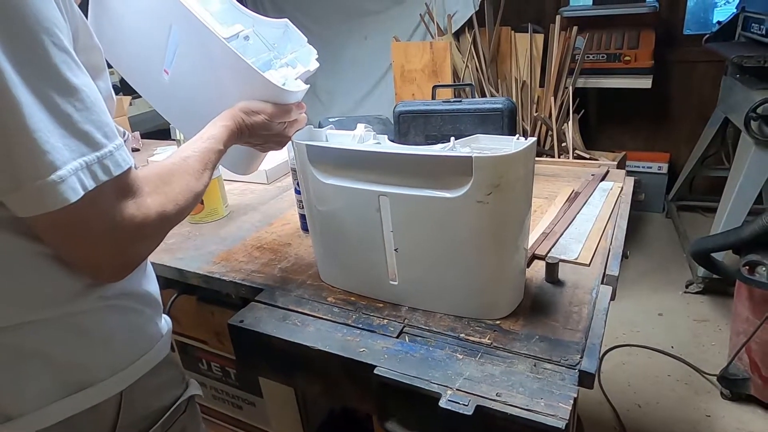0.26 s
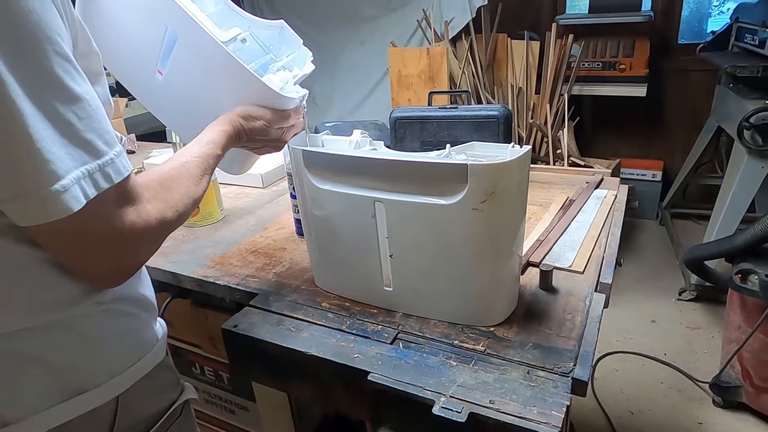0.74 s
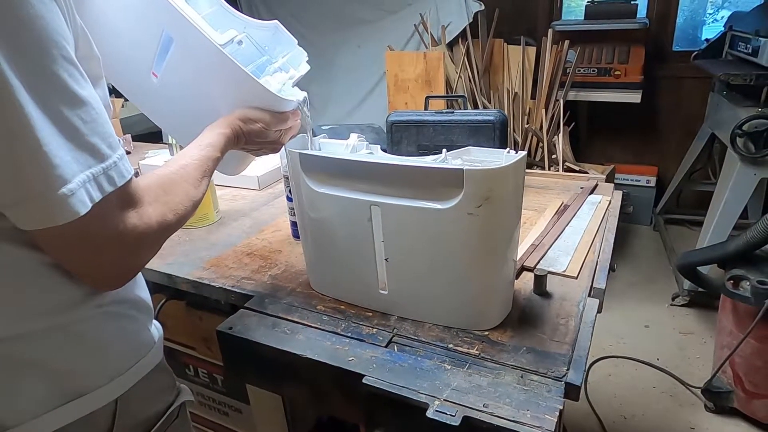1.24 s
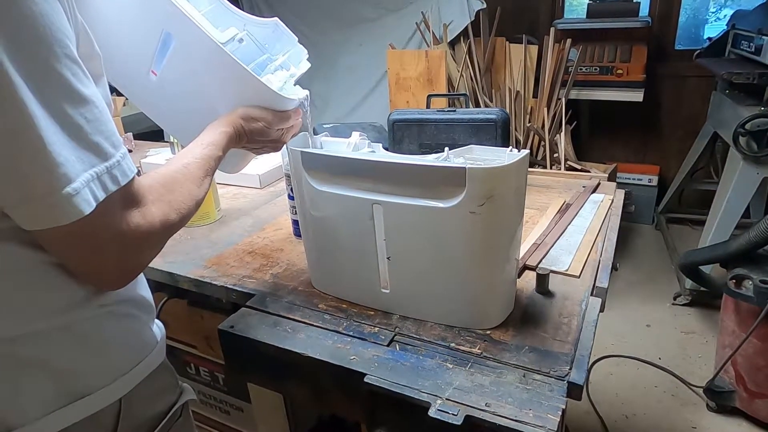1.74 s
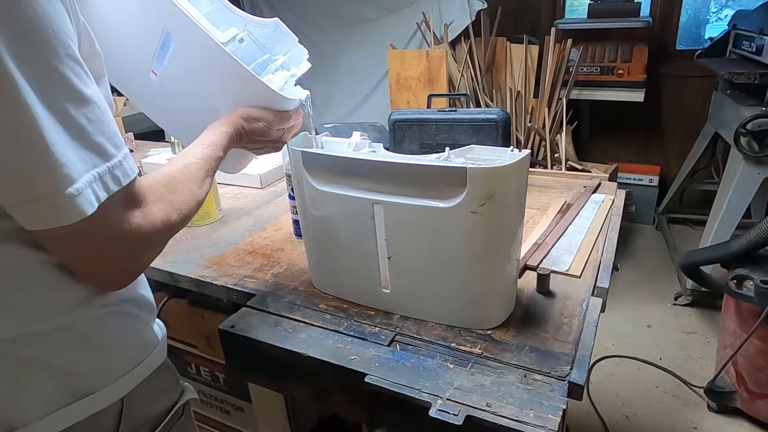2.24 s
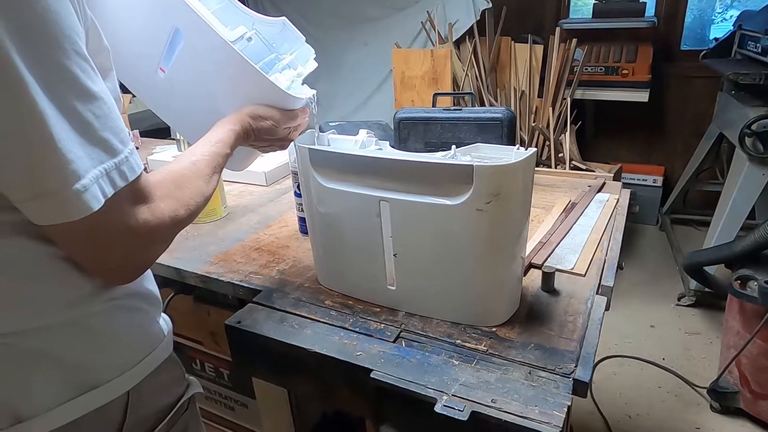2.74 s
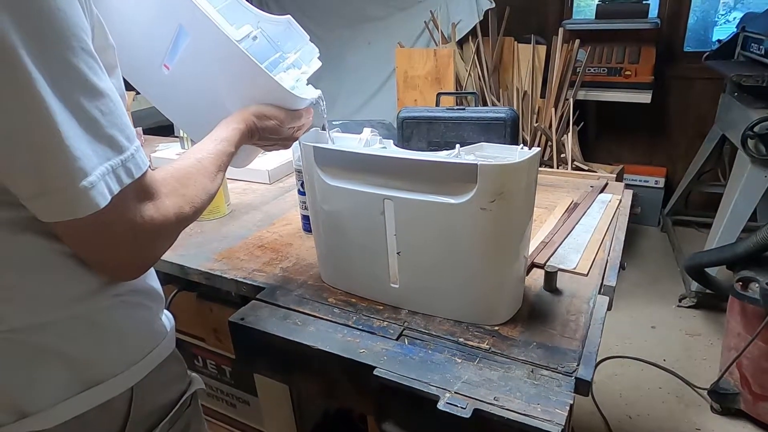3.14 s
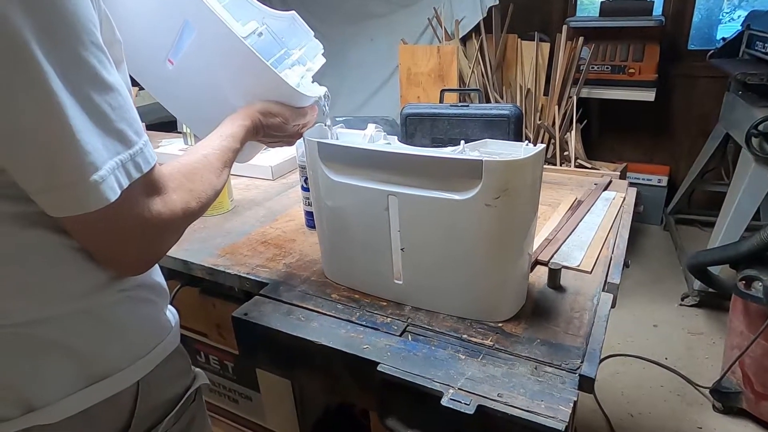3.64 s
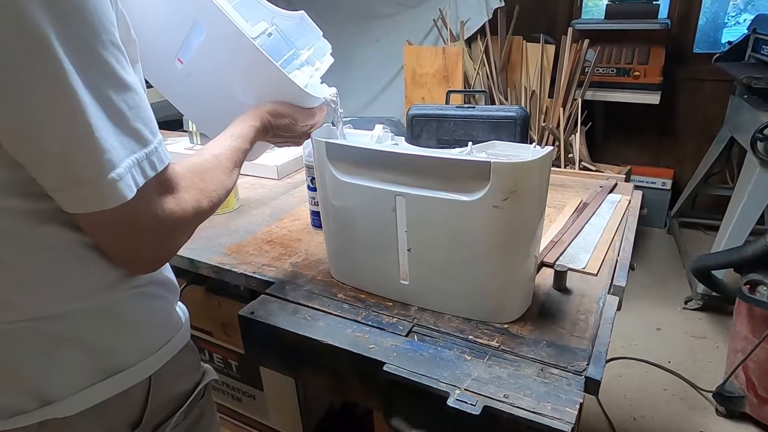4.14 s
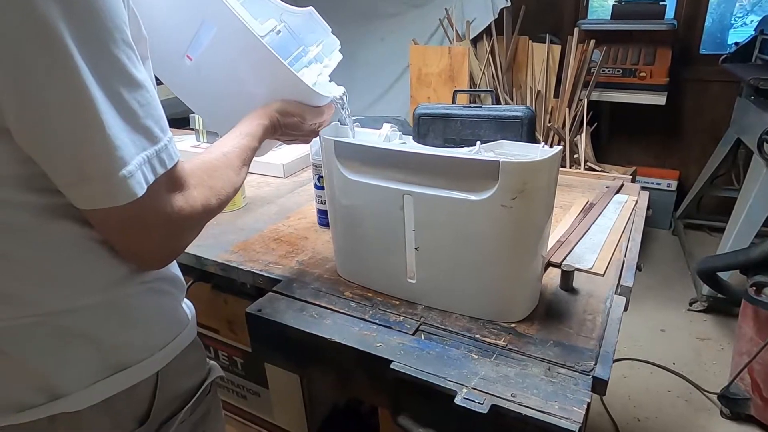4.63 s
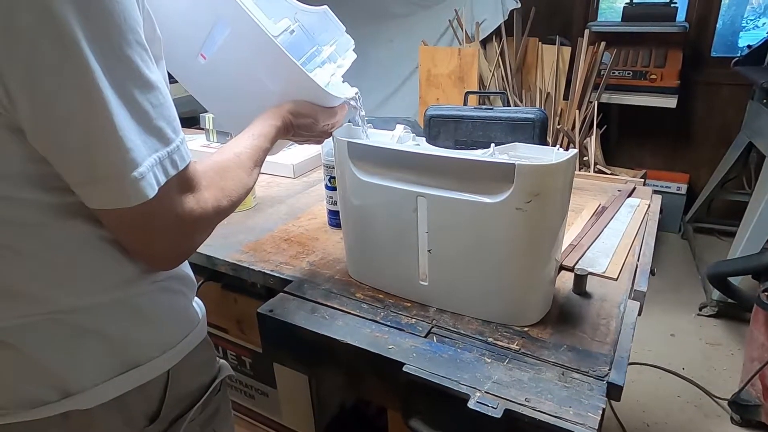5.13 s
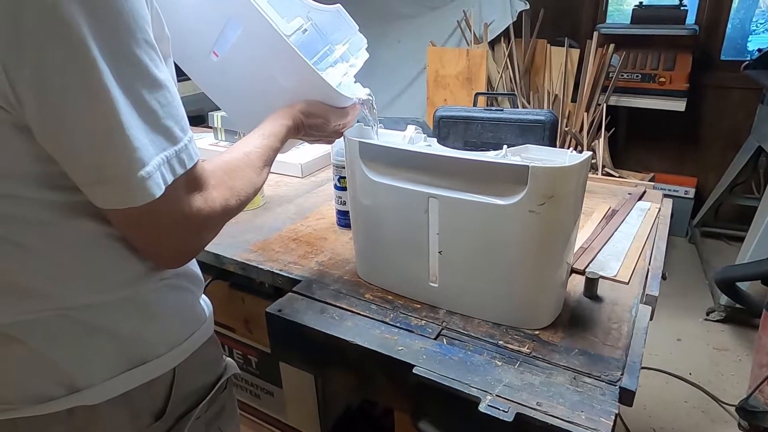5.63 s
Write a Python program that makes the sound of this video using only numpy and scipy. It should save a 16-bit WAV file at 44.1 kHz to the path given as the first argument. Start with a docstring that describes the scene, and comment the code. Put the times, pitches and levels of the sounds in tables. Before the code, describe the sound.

Hands bump a plastic tub, then water tumbles out unevenly into another, with bright slaps, chirping bubbles and short hollow reflections.

```python
"""Water is tipped from one plastic bucket into another on a workshop bench, over quiet room tone.
Hands first knock the bucket: low thuds with scuffing ticks and faint treble puffs.
From about one second a broken stream slaps the water in noise bursts, traps chirping bubbles,
spatters in thousands of tiny grains, drums the resonant walls and thumps the bench.
Reflections in bucket and room ring after it all."""
import sys
import numpy as np
from scipy import signal
from scipy.fft import rfft, irfft, next_fast_len
from scipy.io import wavfile
from scipy.ndimage import uniform_filter1d, map_coordinates

SR = 44100
rng = np.random.default_rng(int(sys.argv[2]) if len(sys.argv) > 2 else 0)


def dump_mix(stems):
    """Bounce the given channels to the path in sys.argv[1] as a 16-bit WAV at rate SR."""
    frames = np.atleast_2d(stems).T  # one column per channel
    limited = np.clip(frames, -1, 1)  # hard clip at full scale
    pcm = np.round(limited * 32767).astype(np.int16)
    wavfile.write(sys.argv[1], SR, pcm)


N = 259308

# strength of the stream: start_s, level_db (spatter, before the cavity)
FLOW = [(0.998, -82), (1.03, -62), (1.2, -43.5), (1.36, -45.5), (1.44, -54), (1.56, -42), (1.72, -57.5),
        (1.8, -56), (2.06, -59), (2.17, -51.5), (2.28, -56), (2.4, -45), (2.76, -47.5), (2.96, -61.5),
        (3.04, -79), (3.1, -55), (3.22, -53), (3.44, -45.5), (3.67, -59.5), (3.779, -43), (3.93, -54.5),
        (4.04, -45), (4.2, -50), (4.38, -43.5), (4.52, -49.5), (4.66, -53.5), (4.74, -46.5), (4.85, -49),
        (5.15, -45.5), (5.88, -43.5)]
# spectrum of the spatter and spray: pitch_hz, level_db (per Hz)
SPATTER = [(400, -40), (544, -2.5), (848, -5), (989, -0.5), (1230, 2.5), (1640, -2.5), (2260, -2),
           (2720, 1.5), (5000, -1.5), (9290, -10.5), (13000, -27), (15600, -32)]


def amp(db):
    """Turns dB into gain."""
    return 10 ** (np.asarray(db) / 20)


def evened(x):
    """Scales to rms 1."""
    return x / np.sqrt(np.mean(x ** 2) + 1e-20)


def read(points, hz):
    """Reads a table on a log-frequency axis."""
    f, value = np.transpose(points)
    return np.interp(np.log(hz + 1), np.log(f + 1), value)


def level_at(curve, s, column=1):
    """Reads a dB curve over time; -120 dB before its first point."""
    columns = np.transpose(curve)
    return np.interp(s, columns[0], columns[column], left=-120)


def add(mix, s, sound):
    """Mixes a sound in at s seconds."""
    part = mix[round(s * SR):][:len(sound)]
    part += sound[:len(part)]


def colour(x, gain):
    """Filters x by a gain given as a function of frequency."""
    size = next_fast_len(x.shape[-1] * 9 // 8)  # room for the filter's tail
    spectrum = rfft(x, size) * gain(np.fft.rfftfreq(size, 1 / SR))
    return irfft(spectrum, size)[..., :x.shape[-1]]


def modes(table):
    """Complex response of a set of damped resonances."""
    return lambda hz: sum(amp(db) / (1 + 2j * (hz - f) / width) for f, width, db in table)


def around(f, hz, octaves):
    """Bell-shaped gain around a pitch, on an octave axis."""
    return np.exp(-.5 * (np.log2((f + 1) / hz) / octaves) ** 2)


def wandering(width):
    """Slow random curve of rms 1: noise smoothed twice over width samples."""
    once = uniform_filter1d(rng.standard_normal(N), size=width)
    return evened(uniform_filter1d(once, size=width))


def bubble(t, hz, cycles, rise):
    """A trapped bubble: a sine dying by 1/e in so many cycles, its pitch climbing near the surface."""
    u = t * hz / cycles
    tone = np.sin(2 * np.pi * hz * t * (1 + rise * u))
    return tone * (1 - np.exp(-u / 0.029)) * np.exp(-u) * (u < 6)


def slaps():
    """Each lump of water landing gives a short burst around its pitch, a bubble and a wide spray."""
    # lumps of water landing: start_s, level_db (before the cavity), pitch_hz (of the burst)
    landings = [(1.062, -34, 5500), (1.107, -20.5, 5880), (1.169, -20, 3700), (1.196, -26.5, 3860),
                (1.27, -10.5, 3830), (1.305, -19.5, 3920), (1.449, -25.5, 6620), (1.488, -28, 5700),
                (1.513, -26, 3210), (1.6, -25.5, 1314), (1.749, -22.5, 3870), (1.766, -27.5, 3550),
                (1.871, -28.5, 4610), (1.965, -29.5, 5530), (1.997, -32, 5660), (2.112, -28, 5860),
                (2.191, -32.5, 1467), (2.299, -26.5, 4800), (2.31, -13.5, 3820), (2.412, -32, 3900),
                (2.482, -19.5, 5490), (2.521, -13.5, 3700), (2.695, -27, 1280), (2.781, -20.5, 3810),
                (2.89, -26.5, 3510), (3.049, -33.5, 4720), (3.131, -24, 3680), (3.13, -34, 1370),
                (3.22, -27, 4860), (3.345, -20.5, 4000), (3.39, -18, 2827), (3.586, -32.5, 5240),
                (3.661, -31.5, 5130), (3.689, -24.5, 3790), (3.897, -28, 4220), (3.985, -26, 4100),
                (4.035, -30, 4700), (4.109, -37, 1127), (4.222, -33, 3610), (4.32, -27, 5330),
                (4.387, -25, 4100), (4.405, -33, 1920), (4.726, -36, 1565), (4.848, -34, 973),
                (4.538, -35.5, 2660), (4.611, -26, 3170), (4.745, -42, 4460), (4.808, -41, 4000),
                (4.86, -25, 2620), (4.914, -26.5, 2950), (4.988, -33, 5500), (5.014, -30, 2800),
                (5.059, -21.5, 3860), (5.097, -27, 3210), (5.132, -24.5, 4800), (5.176, -22, 4180),
                (5.329, -38, 2410), (5.378, -34.5, 1600), (5.392, -27.5, 4360), (5.406, -17.5, 2750),
                (5.409, -26.5, 2130), (5.521, -30, 3540), (5.561, -34, 3600), (5.576, -28.5, 3470),
                (5.632, -22.5, 3460), (5.675, -22, 3530), (5.71, -26, 3360), (5.764, -27, 3220),
                (5.779, -39, 4230), (5.815, -33, 1690)]
    spread_oct, core_oct, core_db = 0.43, 0.18, 1.5  # width of the burst; its narrow core
    spray_db, spray_hz, spray_db_per_oct = -14, 3660, -5.5  # low, flat landings spray more
    bubble_share = 0.36
    out, t = np.zeros(N), np.arange(2048) / SR
    lumps = [*landings, *small_slaps()]
    noise = rng.standard_normal((len(lumps), 2, 2048))
    for (s, db, hz), (a, b) in zip(lumps, noise):
        spray_gain = amp(spray_db + spray_db_per_oct * np.log2(hz / spray_hz))
        cushion = 1 + 0.14 * (s - 1) ** 1.8  # deeper water softens and stretches each landing
        rise = 1 - np.exp(-t / (0.00017 * cushion))
        band = colour(a, lambda f: around(f, hz, spread_oct) + amp(core_db) * around(f, hz, core_oct))
        burst = evened(band) * rise * np.exp(-t / (0.0045 * np.sqrt(cushion)))
        spray = evened(colour(b, lambda f: amp(read(SPATTER, f)))) * rise * np.exp(-t / 0.0087)
        ring = bubble(t, .93 * hz, cycles=12.54, rise=0.0674)
        body = (1 - bubble_share) * burst / abs(burst).max() + 1.08 * bubble_share * ring
        add(out, s, amp(db) * (body + spray_gain * spray))
    return out


def small_slaps():
    """Lesser lumps land at random times, their levels following the stream at that moment."""
    per_s, offset_db, swing_db = 22.0, 0.5, 8  # level relative to the flow, spread either way
    low_hz, high_hz = 1545, 7130
    gap, size, pitch = rng.random((200, 3)).T
    s = FLOW[0][0] + np.cumsum(-np.log(gap + 1e-9) / per_s)
    db = level_at(FLOW, s) + offset_db + swing_db * (2 * size - 1)
    hz = low_hz * (high_hz / low_hz) ** pitch
    return [row for row in zip(s, db, hz) if row[0] < N / SR]


def smacks():
    """Flat smacks on the surface: a few milliseconds of bright crack over a broader wet slap."""
    # smacks, wide in pitch: start_s, treble_db, mid_db (rms of each noise before its envelope)
    smack_table = [(1.107, -43, -28), (1.1324, -31, -21.5), (1.1593, -28, -27), (1.253, -35, -43),
                   (1.27, -44, -23), (1.3047, -38, -36), (1.5975, -28, -31), (1.7494, -29.5, -28),
                   (2.1927, -35, -29), (2.3098, -44, -15), (2.3498, -36, -21.5), (2.6442, -21.5, -25),
                   (2.6952, -31, -37), (2.781, -23, -45), (3.2631, -27.5, -26), (3.39, -44, -31),
                   (3.5871, -24.5, -35.5), (3.6887, -28, -60), (4.009, -30, -38), (4.0296, -24, -35),
                   (4.1059, -23.5, -60), (4.3423, -33, -36), (4.355, -33, -45), (4.42, -31, -47),
                   (5.0681, -20, -18), (5.428, -31, -43), (5.71, -27.5, -35)]
    out, t = np.zeros(N), np.arange(1024) / SR
    noise = rng.standard_normal((len(smack_table), 2, 1024))
    for (s, treble_db, mid_db), (a, b) in zip(smack_table, noise):
        crack = evened(colour(a, lambda f: 1 / (1 + (6000 / (f + 1)) ** 4) / (1 + (f / 10500) ** 6)))
        wet = evened(colour(b, lambda f: 1 / (1 + (950 / (f + 1)) ** 8) / (1 + (f / 5200) ** 4)))
        crack = amp(treble_db) * crack * np.exp(-t / 0.0016)
        wet = amp(mid_db) * wet * np.exp(-t / 0.0022)
        add(out, s, (1 - np.exp(-t / 0.0016)) * (crack + wet))
    return out


def drips():
    """Lone droplets and bubbles: single chirping sines with a softened onset."""
    # start_s, level_db (before the cavity), pitch_hz (nominal), decay_cycles
    drip_table = [(0.833, -48, 8320, 4.9), (1.018, -46.5, 5400, 23), (2.135, -34, 4230, 9),
                  (2.819, -25.5, 1333, 3.7), (3.113, -27, 4600, 4.8), (3.302, -33, 1820, 6.2),
                  (3.735, -29, 1600, 6.7), (3.821, -36.5, 1220, 7.1), (4.167, -33.5, 3260, 8.3),
                  (4.4405, -34.5, 1390, 7.9), (4.479, -41, 1070, 7), (5.695, -24.5, 1825, 8),
                  (5.7446, -27.5, 1180, 4.6), (5.846, -27, 2740, 9)]
    out, t = np.zeros(N), np.arange(2048) / SR
    for s, db, hz, cycles in drip_table:
        onset = 1 - np.exp(-t / 0.00028)
        add(out, s, amp(db) * onset * bubble(t, 0.928 * hz, cycles, rise=0.0647))
    return out


def plinks():
    """Single clear bubbles chirp upward at random, their levels following the stream."""
    per_s, offset_db = 60.0, -2
    low_hz, high_hz = 986, 5090
    out, t = np.zeros(N), np.arange(2048) / SR
    gap, size, pitch, length = rng.random((400, 4)).T
    times = FLOW[0][0] + np.cumsum(-np.log(gap + 1e-9) / per_s)
    levels = level_at(FLOW, times) + offset_db - 2.6 * np.log(size + 0.018)  # a few stand out
    pitches = low_hz * (high_hz / low_hz) ** pitch
    for s, db, hz, c in zip(times, levels, pitches, length):
        add(out, min(s, N / SR), amp(db) * bubble(t, hz, cycles=4.95 + 8.1 * c, rise=0.065))
    return out


def spatter():
    """Thousands of droplets and small bubbles at 32 pitches, in clumps; a few are louder."""
    grains_per_s, clump_db = 130., 2  # rate at each pitch; rms swing of the clumps
    out, t = np.zeros(N), np.arange(1500) / SR
    for hz in np.geomspace(500, 15000, num=32):
        loudness = amp(2.0 * np.minimum(rng.exponential(1, N), 5))
        hits = loudness * (rng.random(N) < grains_per_s / SR)
        grain = bubble(t, hz, cycles=4.0 * rng.uniform(0.12, 2.82), rise=0.051)
        grain = grain / np.linalg.norm(grain)
        # energy per grain follows the spectrum; pitches are log spaced, so higher ones cover more band
        out += signal.oaconvolve(hits, grain)[:N] * amp(read(SPATTER, hz)) * np.sqrt(hz)
    clumped = evened(out * amp(clump_db * wandering(900)))
    return clumped * amp(level_at(FLOW, np.arange(N) / SR))


def drumming():
    """The lumpy stream shakes the plastic walls, which radiate little deep bass."""
    # breathing of the whole bucket: pitch_hz, width_hz, level_db (relative)
    breathing = [(175, 5.4, -3), (192.8, 7.8, -1)]
    # bending of the walls: pitch_hz, width_hz, level_db (relative)
    bending = [(235.7, 36.4, 4.5), (284.8, 2.3, 11.5), (310, 10.3, -0.5), (372.5, 6.6, 2)]
    # level of the drumming before the mix: start_s, deep_db, walls_db
    drum_levels = [(1.0, -78, -90), (1.05, -55, -69), (1.2, -46.5, -55), (1.36, -56, -51),
                   (1.72, -56, -52.5), (2.06, -53.5, -78), (2.26, -48.5, -56.5), (2.36, -67, -46),
                   (2.6, -58, -50.5), (2.8, -51.5, -55.5), (3.04, -63.5, -72.5), (3.22, -55, -63),
                   (3.44, -54, -44.5), (3.6, -56, -59), (3.75, -60, -56), (4.05, -61, -49.5),
                   (4.66, -64, -64.5), (4.9, -76, -51), (5.15, -69, -52), (5.3, -53, -51.5),
                   (5.88, -56.5, -50.5)]
    lumps = evened(uniform_filter1d(rng.standard_normal(N), size=700))
    push = rng.standard_normal(N) * amp(2. * lumps)
    radiate = lambda f: 1 / (1 + (164.5 / (f + 1)) ** 12)
    deep = evened(colour(push, lambda f: modes(breathing)(f) * radiate(f)))
    walls = evened(colour(push, lambda f: modes(bending)(f) * radiate(f)))
    t = np.arange(N) / SR
    return deep * amp(level_at(drum_levels, t)) + walls * amp(level_at(drum_levels, t, column=2))


def bench():
    """Heavy surges shake the bench top: soft swelling thumps of a low sine."""
    # start_s, level_db (the swell tops out 12 dB above it)
    thump_table = [(1.198, -76), (2.38, -77), (2.734, -80), (3.456, -86), (5.091, -83), (5.668, -84)]
    bench_hz = 96
    out, t = np.zeros(N), np.arange(12000) / SR
    for s, db in thump_table:
        swell = np.e * t / 0.0075 * np.exp(-t / 0.03)
        add(out, s, amp(db) * swell * np.sin(2 * np.pi * bench_hz * t))
    return out


def knocks():
    """Hands and rim bump the plastic: a push swells into the hollow, a scuffing tick on top."""
    # start_s, level_db (of the thud), tick_db (relative to level_db), pitch_hz
    knock_table = [(0.004, -45.5, 0, 252), (0.024, -54, 7, 312), (0.152, -45.5, -0.5, 315),
                   (0.187, -48, -7.5, 335), (0.25, -47.5, -6, 238), (0.365, -51.5, -6.5, 328),
                   (0.481, -46.5, -13, 308), (0.609, -47.5, -0.5, 320), (0.671, -50, -1.5, 321)]
    # plastic shell under a knock: pitch_hz, width_hz, level_db (relative)
    shell = [(1010, 200, 11), (1610, 550, 7.5), (1910, 1100, -2), (3240, 960, -7)]
    out, t = np.zeros(N), np.arange(8192) / SR
    noise = rng.standard_normal((len(knock_table), 2, 8192))
    ping = 0.69 * bubble(t, 3400, cycles=3.7, rise=0)
    for (s, db, tick_db, hz), (a, b) in zip(knock_table, noise):
        rough = colour(a, lambda f: around(f, hz, 0.42))
        rough = rough * (1 - np.exp(-t / 0.0063)) * np.exp(-t / 0.036)
        thud = 0.68 * rough / abs(rough).max() + 0.31 * bubble(t, hz, cycles=5.4, rise=0)
        tick = colour(b, lambda f: modes(shell)(f) / (1 + (f / 4300) ** 8))
        tick = tick * (np.exp(-t / 0.0059) + 0.67 * np.exp(-t / 0.02))
        scuff = (1 - np.exp(-t / 0.00022)) * (tick / abs(tick).max() + ping)
        add(out, s, amp(db) * (thud + amp(tick_db) * scuff))
    return out


def ticks():
    """Faint soft puffs of treble noise a few milliseconds long."""
    # start_s, level_db (rms of the noise before its envelope)
    tick_table = [(0.055, -70), (0.18, -64.5), (0.247, -62), (0.361, -67), (0.478, -67)]
    out, t = np.zeros(N), np.arange(1024) / SR
    for (s, db), a in zip(tick_table, rng.standard_normal((len(tick_table), 1024))):
        puff = evened(colour(a, lambda f: 1 / (1 + (5500 / (f + 1)) ** 4) / (1 + (f / 9000) ** 12)))
        add(out, s, amp(db) * puff * (1 - np.exp(-t / 0.0013)) * np.exp(-t / 0.0036))
    return out


def cavity(x):
    """Air and wall resonances colour the water sound leaving the bucket, which loses its bass."""
    # pitch_hz, width_hz, level_db (before the 0.22 blend)
    resonances = [(1013, 4.7, 24), (1334, 27, 12.5), (1490, 22, 9.5), (1645, 20, 16), (3785, 63, 7)]
    return colour(x, lambda f: (1 + modes(resonances)(f) * 0.22) / (1 + (507.0 / (f + 1)) ** 4))


def scattered(x):
    """The landing point dances about, so the delay to the right side wanders by a sample or so."""
    delayed = map_coordinates(x, [np.arange(N) + 1.03 * wandering(600)], order=5)
    return np.array([x, delayed])


def alike(pair):
    """Blends two unrelated signals into a left-right pair whose likeness varies with frequency."""
    # pitch_hz, likeness (0 unrelated, 1 mono)
    likeness = [(30, .1), (80, 0.23), (150, 0.74), (400, 0.28), (1000, 0.83), (2200, 0.6), (4500, 0.52),
                (10000, 0.33)]
    same = lambda f: np.clip(read(likeness, f), 0, 1)
    right = colour(pair[0], same) + colour(pair[1], lambda f: np.sqrt(1 - same(f) ** 2))
    return np.array([pair[0], right])


def ringing(x):
    """Dense reflections in bucket and room, each band of noise dying at its own speed."""
    # pitch_hz, t60_s
    decay = [(200, 0.17), (800, 0.34), (2000, 0.33), (4000, 0.3), (10000, 0.38), (15000, 0.23)]
    out = 0
    # three noise tails take turns, 9 times a second,
    # so the reverberation stays smooth and free of steady tones
    for k in range(3):
        hz, t, z = signal.stft(alike(rng.standard_normal((2, SR // 2))), SR, nperseg=256)
        fading = z * amp(-60 * t / read(decay, hz)[:, None])
        tail = signal.istft(fading, SR, nperseg=256)[1]
        age = np.arange(tail.shape[1]) / SR
        tail = tail * np.clip(age / 0.0029, 0, 1)
        tail = tail * (1 + 2.2 * np.exp(-age / 0.0021))  # quick echoes inside the bucket
        turn = np.sqrt(2 / 3) * np.cos(2 * np.pi * (9. * np.arange(N) / SR + k / 3))
        tail = tail / np.linalg.norm(tail[0])
        out += signal.fftconvolve((x * turn)[None], tail, axes=1)[:, :N]
    return out


def hush():
    """Quiet tone of the workshop: steady shaped noise."""
    # pitch_hz, level_db (per Hz, relative)
    room_tone = [(20, -6), (48, -3), (86, -3), (202, 10.5), (705, -9.5), (1300, -4), (1410, 1.5),
                 (1520, -8.5), (5180, -18), (11500, -34), (15000, -70), (22000, -120)]
    noise = alike(rng.standard_normal((2, N)))
    return amp(-69) * evened(colour(noise, lambda f: amp(read(room_tone, f))))


def scene():
    """Water rings in the cavity; all but the bench and hush arrive directly and by reflection."""
    water = cavity(slaps() + drips() + smacks() + plinks() + spatter())
    bumps = knocks() + ticks()
    body = drumming()
    near = scattered(amp(-2.0) * water) + bumps + body + bench()
    reflected = ringing(amp(-4.0) * water + amp(0.5) * bumps + amp(-12.0) * body)
    return near + reflected + hush()


def record(dry):
    """Two microphone ports differ a little in phase and level; then the band limit."""
    # pitch_hz, phase_rad (left leads)
    port_phase = [(200, -0.15), (1000, -0.04), (2800, -0.55), (5200, -0.97), (7750, -1.28), (15300, -3.0)]
    # pitch_hz, level_db (left minus right)
    port_db = [(100, -1), (1000, -0.5), (3000, 1.5), (5000, 0.8), (8000, -1.5), (13000, -4.5)]
    edge_hz = 15800
    # each side takes half the difference
    left = lambda f: amp(read(port_db, f) / 2) * np.exp(.5j * read(port_phase, f))
    ports = np.array([colour(dry[0], left), colour(dry[1], lambda f: 1 / left(f))])
    lowpass = signal.firwin(511, edge_hz, window=("kaiser", 9), fs=SR)
    return signal.oaconvolve(ports, lowpass[None], "same")


dry = scene()
out = record(dry)
dump_mix(out)
```